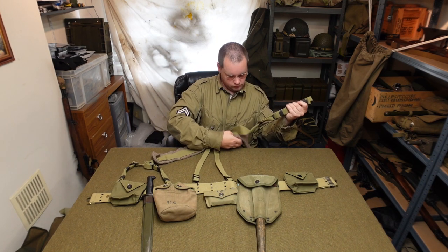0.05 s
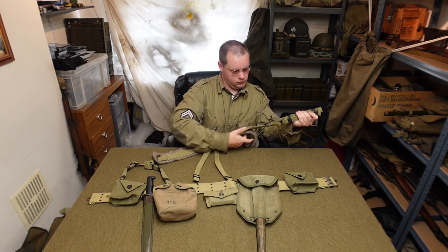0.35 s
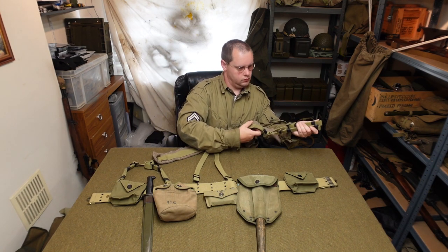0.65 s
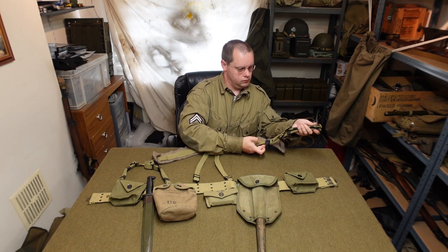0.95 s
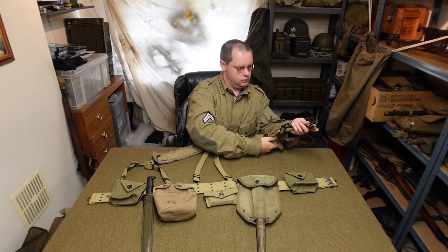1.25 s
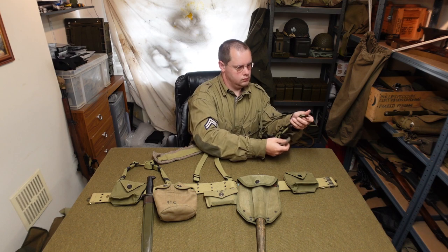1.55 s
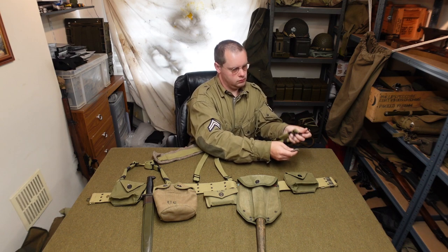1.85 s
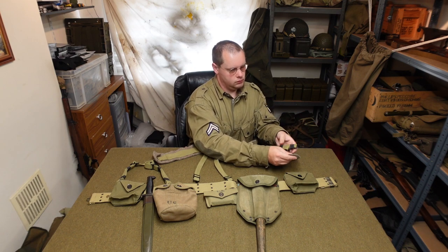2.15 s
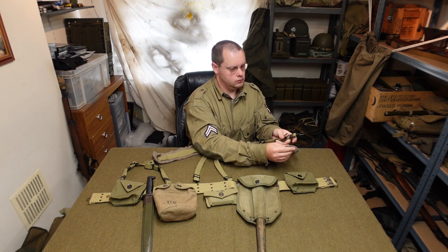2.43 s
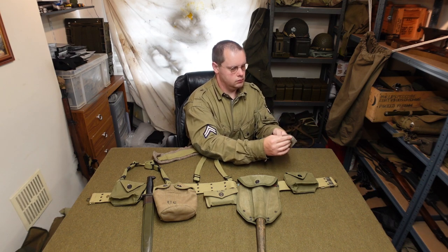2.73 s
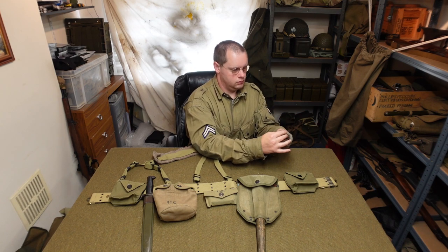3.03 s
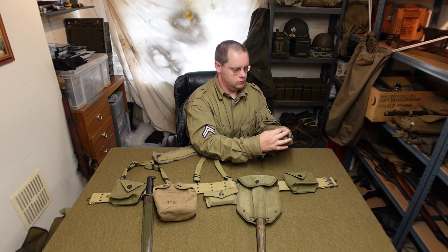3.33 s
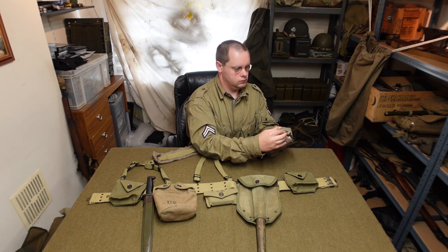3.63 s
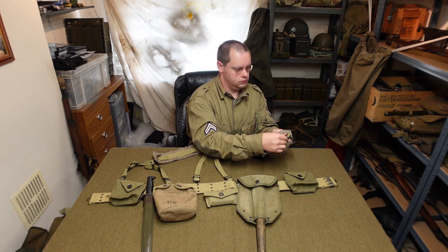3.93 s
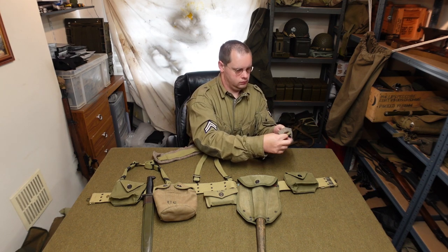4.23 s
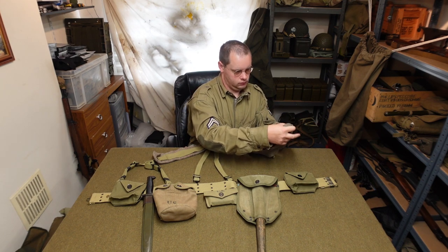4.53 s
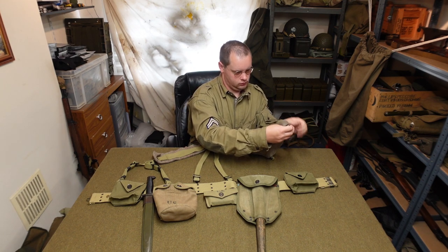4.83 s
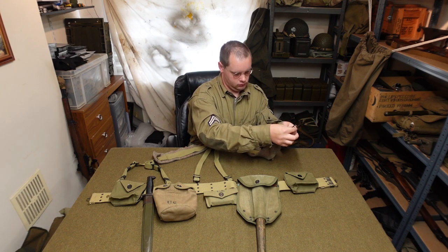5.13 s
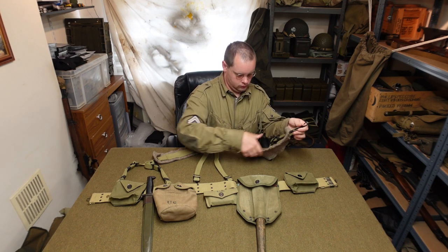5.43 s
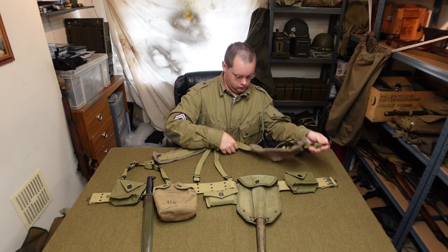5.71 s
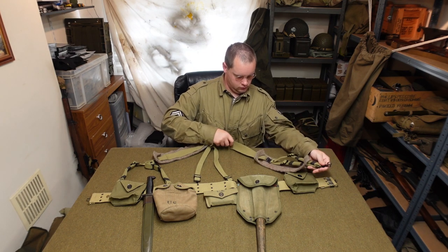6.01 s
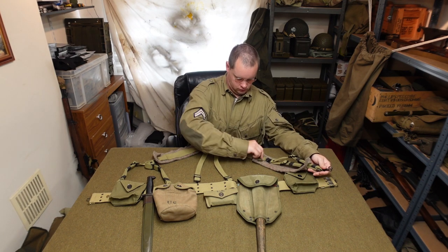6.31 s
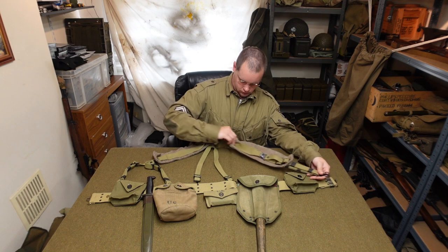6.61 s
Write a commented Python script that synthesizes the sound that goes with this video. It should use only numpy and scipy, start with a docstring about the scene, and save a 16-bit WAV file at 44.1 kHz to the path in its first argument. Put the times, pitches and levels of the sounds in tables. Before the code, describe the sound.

Canvas straps rustle while metal buckles and rings click and chink, then the straps drag across a cloth-covered table.

```python
"""Canvas suspenders at a table

One microphone, nearly mono, within arm's reach of a cloth-covered table in a small, crowded room.
Metal buckle, sliders, rings and hook click and chink as they strike; webbing rubs on hands and sleeves,
stiff folds snap and a forearm bumps the table. Near the end the straps are drawn across the table top.
Wide arm movements push air at the microphone, over a steady room tone."""
import sys
import numpy as np
from scipy import signal
from scipy.fft import rfft, irfft, next_fast_len
from scipy.io import wavfile
from scipy.ndimage import map_coordinates

SR = 44100
rng = np.random.default_rng(int(sys.argv[2]) if len(sys.argv) > 2 else 0)


def generate_wav(signal):
    """Clip the signal to [-1, 1] and save it as 16-bit WAV at the path in sys.argv[1]."""
    frames = np.transpose(np.atleast_2d(signal))
    scaled = np.clip(frames, -1, 1) * 32767
    pcm = np.round(scaled).astype(np.int16)
    wavfile.write(sys.argv[1], SR, pcm)


N = 302512
TIME_S = np.arange(N) / SR


def amp(db):
    """Decibels to gain."""
    return np.exp(np.asarray(db) * (np.log(10) / 20))


def unit(x):
    """Scale to rms 1."""
    return x / np.sqrt(np.mean(x ** 2) + 1e-20)


def along(points, hz):
    """Read (freq_hz, value) points on a log axis."""
    freqs, values = np.transpose(points)
    return np.interp(np.log(hz + 1), np.log(freqs + 1), values)


def wobble(rate_hz):
    """A smooth random curve with rate_hz knots a second."""
    knots = rng.standard_normal(int(N * rate_hz / SR) + 4)
    return map_coordinates(knots, [TIME_S * rate_hz])


def swell(peak_s, width_s):
    """A bell-shaped rise and fall, 1 at its top."""
    return np.exp(-.5 * ((TIME_S - peak_s) / width_s) ** 2)


def filtered(x, response):
    """x through a gain that depends on frequency."""
    n = x.shape[-1]
    padded = next_fast_len(n + 8192)
    return irfft(rfft(x, padded) * response(np.fft.rfftfreq(padded, 1 / SR)), padded)[..., :n]


def coloured(x, spectrum):
    """x shaped by (freq_hz, level_db) points, at rms 1."""
    return unit(filtered(x, lambda hz: amp(along(spectrum, hz))))


def bell_band(x, centre_hz, octaves):
    """x through a bell-shaped band on a log axis."""
    return filtered(x, lambda hz: np.exp(-.5 * (np.log2((hz + 1) / centre_hz) / octaves) ** 2))


def add(track, start_s, sound):
    """Mix a sound into the track at start_s."""
    part = track[max(round(start_s * SR), 0):][:len(sound)]
    part += sound[:len(part)]


# The small room's short decay: freq_hz, t60_s
ROOM_DECAY = [(150, 0.2), (1000, 0.17), (4000, 0.19), (9000, 0.13), (15000, 0.11)]
def in_room(sound, wet_db, build_s=0.0028):
    """The direct sound at the microphone plus a diffuse tail from table, shelves and walls."""
    hz, t, noise = signal.stft(rng.standard_normal(SR // 5), SR, nperseg=256)
    decay = amp(-60 * t / along(ROOM_DECAY, hz)[:, None])
    _, tail = signal.istft(noise * decay, SR, nperseg=256)
    tail *= 1 - np.exp(-(TIME_S[:len(tail)] / build_s) ** 2)
    reflections = unit(signal.fftconvolve(sound, tail)[:len(sound)])
    return sound + amp(wet_db) * sound.std() * reflections


def strike(modes, crack_db, crack_t60_s, scatter_db=1, detune=0):
    """One blow: decaying modes at fresh strengths under a short contact noise; the grip detunes them."""
    t = TIME_S[:SR // 5]
    ring = 0
    for k, (hz, db, t60_s) in enumerate(modes):
        decay = amp(db + scatter_db * rng.standard_normal() - 60 * t / t60_s)
        pitch_hz = hz * (1 + detune * rng.standard_normal())
        ring += (-1) ** k * decay * np.sin(2 * np.pi * pitch_hz * t)
    crack = amp(crack_db - 60 * t / crack_t60_s) * rng.standard_normal(len(t))
    return ring + crack


def clicks(hits, modes, crack_db, crack_t60_s, body_db, wet_db, detune):
    """Clicks on one set of modes: gentle ones have more body, bare metal on metal has more edge."""
    track = np.zeros(N)
    for start_s, level_db, edge_db in hits:
        mid_db = body_db - 0.41 * level_db
        # small parts radiate little bass
        tone = [(300, mid_db - 30), (800, mid_db - 13), (1500, mid_db),
                (3000, 0), (8000, 0), (13000, edge_db)]
        click = coloured(strike(modes, crack_db, crack_t60_s, detune=detune), tone)
        add(track, start_s, amp(level_db) * in_room(click / np.linalg.norm(click), wet_db))
    return track


# A faint, dull tick just ahead of the loud buckle clack, then two softer clacks:
# start_s, level_db, edge_db
TICK_AND_CLACKS = [(0.545, -24, -15), (0.5527, 6, 1), (2.396, -7, 3.5), (4.2647, -19, -14)]
# The smaller fittings striking close to the microphone: start_s, level_db, edge_db
SLIDER_CLICKS = [(0.8845, -7.5, -1), (0.8913, 2.5, 0), (5.7893, -8.5, -1.5), (5.961, -19, -6),
                 (6.3165, -5, -0.5), (6.5558, -10.5, -1), (6.6484, -19, -4), (6.6972, -15.5, -1)]
LOOP_CLICKS = [(0.198, -18, -24), (0.2141, -10.5, -27), (0.226, -14, -14), (0.2397, -17.5, -10),
               (1.2288, -12, -6)]
RING_CHINKS = [(0.7412, -11, 4), (1.1643, -29, -2), (1.601, -14, 1), (1.6236, -13, -5), (1.7252, -18, -6),
               (1.7847, -21.5, -22), (1.838, -21.5, -22), (2.0386, -24.5, -7)]
CLASP_CHINKS = [(5.0959, -11, 0)]
# How each fitting rings: pitch_hz, relative_db, t60_s
BUCKLE_MODES = [(1500, -17, 0.0076), (2570, -6, 0.017), (3246, 4, 0.0065), (3740, -2, 0.01),
                (3940, -20, 0.0091), (4840, -5, 0.0045), (7000, -49, 0.002), (8470, 8, 0.012),
                (9100, 2, .004), (10800, -3, 0.0081), (11760, 6, 0.0035), (13400, 7, 0.014),
                (14700, 3, 0.0068), (15300, -1, 0.0037)]
SLIDER_MODES = [(1740, -26, 0.011), (2554, -10, 0.016), (4150, -1.5, 0.0075), (5060, -4.5, 0.0095),
                (6470, -0.5, 0.013), (8320, -1, 0.0052), (8900, -17, 0.0042), (10100, -23, .008),
                (13300, 8, 0.0041), (13960, 2.5, 0.015)]
LOOP_MODES = [(1380, -9.5, 0.012), (3120, -6, .008), (4360, 3.5, 0.012), (4710, 2.5, 0.024),
              (6950, -13, 0.0073), (8400, -15, .01), (12800, 1, .012)]
RING_MODES = [(2880, 2.5, 0.017), (4235, -2.5, 0.056), (8150, -0.5, 0.062), (8580, 0, 0.049),
              (11080, -1, 0.052), (12700, 0, .04), (13300, -12, .04), (15500, -10, .03)]
CLASP_MODES = [(3960, -5, 0.015), (5370, -7, 0.11), (7760, -10, .025), (8270, -5, .04), (10400, -23, 0.026),
               (10900, -6.5, 0.019), (11800, -3, 0.023), (13300, -1, .022)]
def fittings():
    """Metal threaded on webbing clacks and stops; loose rings and the clasp chink on."""
    buckle = clicks(TICK_AND_CLACKS, BUCKLE_MODES, crack_db=8, crack_t60_s=0.016,
                    body_db=-6, wet_db=-1.5, detune=0.012)
    sliders = clicks(SLIDER_CLICKS, SLIDER_MODES, crack_db=10, crack_t60_s=0.0056,
                     body_db=0.5, wet_db=-5.5, detune=0.014)
    loop = clicks(LOOP_CLICKS, LOOP_MODES, crack_db=3, crack_t60_s=0.014,
                  body_db=1.5, wet_db=-2, detune=0.015)
    rings = clicks(RING_CHINKS, RING_MODES, crack_db=6.5, crack_t60_s=0.013,
                   body_db=0.5, wet_db=-2, detune=0.015)
    clasp = clicks(CLASP_CHINKS, CLASP_MODES, crack_db=1.5, crack_t60_s=0.035,
                   body_db=2, wet_db=2, detune=0.0072)
    return buckle + sliders + loop + rings + clasp


# The hook's touches above the table: start_s, level_db
HOOK_TOUCHES = [(2.0928, -21.5), (2.1259, -29.5)]
# Its freely ringing steel: pitch_hz, relative_db, t60_s
HOOK_MODES = [(2980, -19.5, 0.081), (5330, -13.5, 0.17), (5580, -10.5, 0.045), (5740, -9, 0.037),
              (8134, 3, 0.087), (8174, -0.5, 0.11), (8970, -14, 0.077), (10180, -22, 0.1),
              (12230, -23, .15), (13300, -23, .1), (13600, -12, .1), (14850, -28, .12)]
def hook():
    """The steel hook swings free, rings and touches once more."""
    track = np.zeros(N)
    for start_s, level_db in HOOK_TOUCHES:
        ping = strike(HOOK_MODES, crack_db=-5.5, crack_t60_s=0.0083)
        add(track, start_s, amp(level_db) * in_room(ping / np.abs(ping).max(), wet_db=-6))
    return track


def friction(spectrum, catches_per_s, spread_db, grain_db, uneven_db):
    """Threads catch and let go at random over the hiss of sliding fibres."""
    catches = rng.random(N) < catches_per_s / SR
    slips = catches * rng.choice([-1, 1], N) * amp(spread_db * rng.standard_normal(N))
    weave = amp(grain_db) * unit(slips) + rng.standard_normal(N)
    return coloured(in_room(weave, wet_db=-6.5), spectrum) * amp(uneven_db * wobble(35))


# How hard the hands work the webbing: time_s, relative_db
HAND_EFFORT = [(0.0, -58.5), (0.11, -53), (0.38, -51), (0.57, -53), (0.83, -56), (0.92, -53), (1.45, -48.5),
               (1.73, -51.5), (1.87, -53), (2.48, -55.5), (2.59, -57), (3.08, -58), (3.49, -60),
               (3.74, -55.5), (4.44, -55), (4.67, -58), (4.98, -58.5), (5.5, -53.5)]
# Straps drawn across the table: start_s, fastest_s, end_s, swish_db, scrape_db
STRAP_PULLS = [(5.518, 5.78, 5.87, -46.5, -62), (5.887, 5.926, 6.07, -61, -48.5),
               (6.38, 6.537, 6.75, -45, -47.5)]
# Webbing, sleeves and table cloth heard from close by: freq_hz, relative_db
RUB_SPECTRUM = [(80, -11), (150, -4.5), (300, -3), (500, -2), (900, 1), (1500, -2.5), (2600, -6),
                (4000, -8), (9000, -19)]
SWISH_SPECTRUM = [(900, -0.5), (2000, -1), (3500, -6), (5200, -4.5), (8300, -6), (10500, -14.5),
                  (13600, -10.5), (15100, -20), (16000, -34)]
SCRAPE_SPECTRUM = [(150, -25), (350, -11), (560, -4.5), (850, -3), (1300, -12.5), (2200, -15.5),
                   (5000, -25), (15000, -32)]
def canvas():
    """With effort, webbing rubs low and sleeves swish high; each pull scrapes the table cloth."""
    effort_db = np.interp(TIME_S, *np.transpose(HAND_EFFORT))
    effort_db -= effort_db.mean()
    pull_swish, pull_scrape = np.zeros((2, N))
    for start_s, fastest_s, end_s, swish_db, scrape_db in STRAP_PULLS:
        speed = np.interp(TIME_S, [start_s, fastest_s, end_s], [0, 1, 0])
        loudness = speed ** 0.46
        pull_swish += amp(swish_db) * loudness
        pull_scrape += amp(scrape_db) * loudness
    # handling and pulling add in power
    rub_gain = np.hypot(amp(-57.5 + 0.92 * effort_db), amp(-5.5) * pull_swish)
    swish_gain = np.hypot(amp(-59 + 1.34 * effort_db), pull_swish)
    rub = friction(RUB_SPECTRUM, catches_per_s=400, spread_db=3.5, grain_db=-0.5, uneven_db=1.5)
    swish = friction(SWISH_SPECTRUM, catches_per_s=900, spread_db=2.5, grain_db=-4, uneven_db=1.5)
    # tiny stray ticks of the stiff weave
    crinkle = friction(SWISH_SPECTRUM, catches_per_s=35, spread_db=5.5, grain_db=18, uneven_db=1)
    scrape = friction(SCRAPE_SPECTRUM, catches_per_s=500, spread_db=3, grain_db=4, uneven_db=1.8)
    return rub_gain * rub + swish_gain * (swish + amp(-11) * crinkle) + pull_scrape * scrape


# Stiff canvas snapping over a fold in the hands: start_s, level_db, centre_hz
FOLD_SNAPS = [(0.0687, -27, 2280), (0.8118, -14.5, 6460), (0.9634, -24, 3900), (1.1316, -22.5, 5400),
              (1.1958, -21.5, 2500), (1.2283, -14.5, 7000), (1.273, -16, 5470), (1.5492, -20.5, 6960),
              (1.6229, -18, 2800), (1.8583, -14.5, 1600), (1.8886, -25, 4000), (2.309, -24, 3770),
              (2.5243, -19.5, 3000), (2.8748, -21, 3000), (2.9123, -26.5, 2500), (3.6566, -21.5, 3000),
              (4.9307, -30, 5000), (5.239, -23, 2800), (5.5563, -18.5, 1880), (5.9567, -22, 1390)]
def creases():
    """Folds give way with a dry tick and no ring; thick folds tick lower."""
    track = np.zeros(N)
    for start_s, level_db, centre_hz in FOLD_SNAPS:
        snap = strike(modes=[], crack_db=0, crack_t60_s=0.012)
        tick = bell_band(snap, centre_hz, octaves=0.98)
        add(track, start_s, amp(level_db) * in_room(tick / np.linalg.norm(tick), wet_db=0))
    return track


# Fingers and sleeve brushing the webbing, close up: peak_s, width_s, level_db, centre_hz
WEBBING_STROKES = [(0.235, 0.025, -57, 1140), (0.803, 0.043, -45.5, 4500), (1.046, 0.031, -49.5, 700),
                   (1.308, 0.06, -52, 1510), (1.869, 0.02, -48.5, 1100), (3.133, 0.018, -54, 4000),
                   (3.283, 0.018, -53, 5000), (3.407, 0.017, -54.5, 4500), (3.597, 0.082, -55, 6500),
                   (3.852, 0.08, -56.5, 1500), (4.014, 0.015, -49.5, 1090), (4.118, 0.0083, -54.5, 1700),
                   (4.424, 0.012, -57, 1500), (4.582, 0.036, -55, 4520), (4.906, 0.035, -55.5, 2190),
                   (5.403, 0.031, -54.5, 4500), (5.769, 0.022, -44.5, 1670)]
def strokes():
    """Each stroke swells and fades: fingertips rub low and narrow, the sleeve brushes high and broad."""
    track = np.zeros(N)
    t = np.linspace(-.25, .25, SR // 2)
    spectrum = [(100, 7.5), (15000, -17)]
    fibres = friction(spectrum, catches_per_s=400, spread_db=3.5, grain_db=-9.5, uneven_db=1.4)
    for peak_s, width_s, level_db, centre_hz in WEBBING_STROKES:
        stretch = fibres[int(peak_s * SR):][:len(t)]
        band = bell_band(stretch, centre_hz, octaves=(centre_hz / 1000) ** 0.4)
        envelope = np.exp(-.5 * (t / width_s) ** 2)
        add(track, peak_s + t[0], amp(level_db) * envelope * unit(band))
    return track


# Soft bumps on the table by the microphone: start_s, level_db, upper_edge_hz
ARM_BUMPS = [(1.075, -44.5, 148), (1.859, -41, 2220), (2.263, -46, 900), (2.583, -45, 600),
             (2.871, -27, 384), (2.884, -35.5, 765), (5.925, -33, 760), (5.958, -30.5, 1480),
             (6.315, -44, 140)]
# The table's resonances: pitch_hz, relative_db, t60_s
TABLE_MODES = [(61, -2, 0.15), (107, -2, 0.18), (189, -2, 0.049), (253, -1, 0.043), (319, 1, 0.046),
               (405, -2.5, 0.043), (751, -1.5, 0.033), (1065, -1, 0.048), (1916, 15.5, 0.03)]
def table_bumps():
    """Padded blows wake only a band of the table's modes: the softer the pad, the lower the band."""
    track = np.zeros(N)
    for start_s, level_db, edge_hz in ARM_BUMPS:
        pad = signal.butter(2, [edge_hz / 2.6, edge_hz], "bandpass", fs=SR, output="sos")
        thud = signal.sosfilt(pad, strike(TABLE_MODES, crack_db=9.5, crack_t60_s=0.079))
        add(track, start_s, amp(level_db) * in_room(thud / np.abs(thud).max(), wet_db=-6.5))
    return track


# The table top answering a dragged strap: peak_s, width_s, level_db, pitch_hz
DRAG_GROANS = [(6.442, 0.021, -49, 550), (6.61, 0.032, -53, 730), (6.8, 0.028, -53, 498)]
def table_groans(half_band_hz=45):
    """The ribbed weave running over the table groans briefly in a narrow, hollow band."""
    track = np.zeros(N)
    for peak_s, width_s, level_db, pitch_hz in DRAG_GROANS:
        resonance = lambda hz: 1 / (1 + ((hz - pitch_hz) / half_band_hz) ** 2)
        groan = unit(filtered(rng.standard_normal(N), resonance))
        track += amp(level_db) * swell(peak_s, width_s) * groan
    return track


# Air pushed at the microphone by the arms: peak_s, width_s, level_db
ARM_PUFFS = [(0.0, 0.06, -45), (1.243, 0.074, -47), (5.812, 0.11, -53), (6.372, 0.026, -43.5),
             (6.75, 0.2, -53.5)]
# Its rumble on the capsule: freq_hz, relative_db
AIR_SPECTRUM = [(5, -3), (11, -1), (28, -15), (60, -20), (120, -31.5), (300, -68)]
def moving_air():
    """Slow air rumbles faintly at the microphone and swells with each wide arm movement."""
    puffs = sum(amp(level_db) * swell(peak_s, width_s) for peak_s, width_s, level_db in ARM_PUFFS)
    return (amp(-59) + puffs) * coloured(rng.standard_normal(N), AIR_SPECTRUM)


# The room's own sound, heard from the table: freq_hz, relative_db
ROOM_SPECTRUM = [(12, -29), (20, 7.5), (35, -4), (98, -7.5), (182, -8), (319, -8.5), (377, -12.5),
                 (446, -7.5), (1290, -22), (1810, -17.5), (4420, -25), (8410, -20.5), (11100, -25.5),
                 (13900, -24), (16000, -32)]
def room_tone():
    """Steady low noise with a faint hiss on top."""
    return amp(-57.5) * coloured(rng.standard_normal(N), ROOM_SPECTRUM)


def scene():
    """Everything sits in the centre; only a trace of noise spreads to the sides."""
    suspenders = fittings() + hook() + canvas() + creases() + strokes()
    mid = suspenders + table_bumps() + table_groans() + moving_air() + room_tone()
    side_spectrum = [(30, -5), (150, -3.5), (600, -12), (2000, -34), (8000, -18.5), (15000, -17)]
    side = amp(-70.5) * coloured(rng.standard_normal(N), side_spectrum)
    return np.array([mid + side, mid - side])


def record(dry):
    """The recorder keeps nothing above its band limit."""
    cutoff_hz, transition_hz = 15900, 400
    return filtered(dry, lambda hz: np.clip((cutoff_hz - hz) / transition_hz + .5, 0, 1))


dry = scene()
out = record(dry)
generate_wav(out)
```